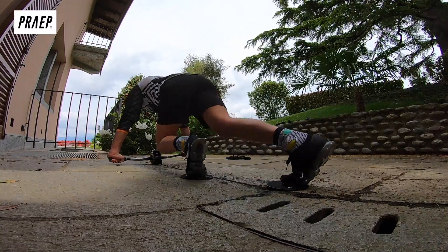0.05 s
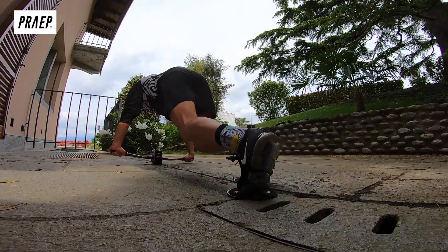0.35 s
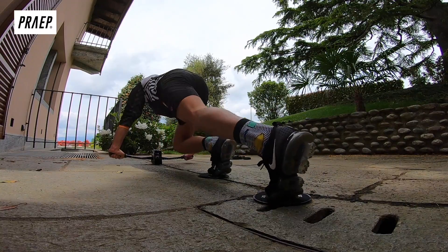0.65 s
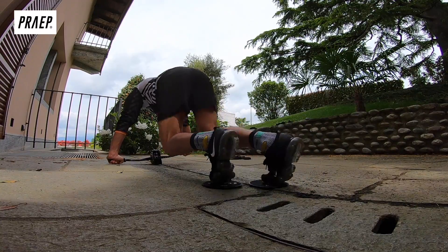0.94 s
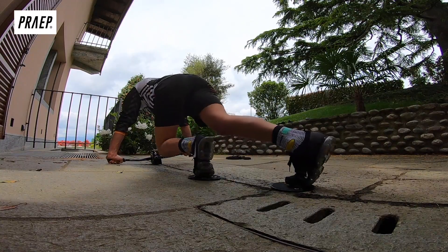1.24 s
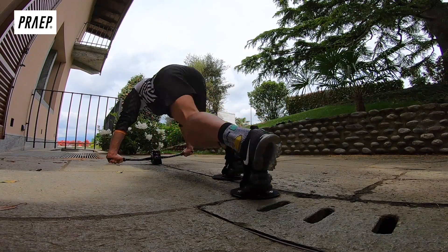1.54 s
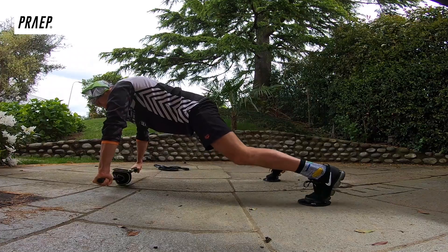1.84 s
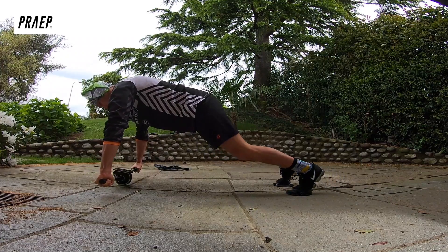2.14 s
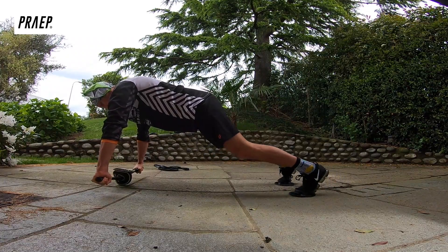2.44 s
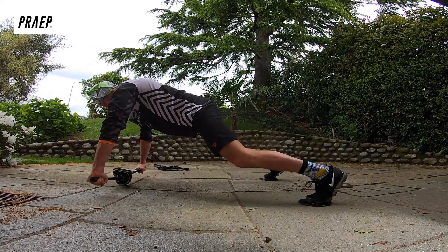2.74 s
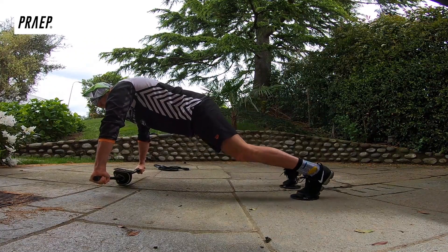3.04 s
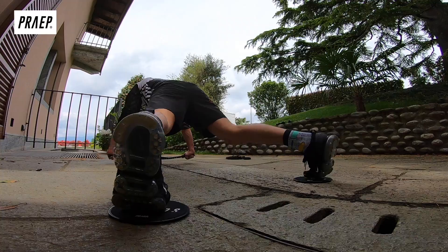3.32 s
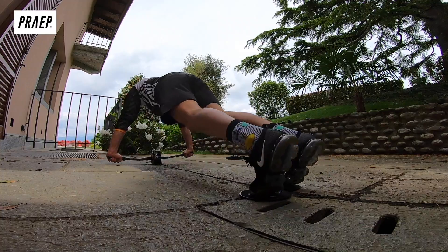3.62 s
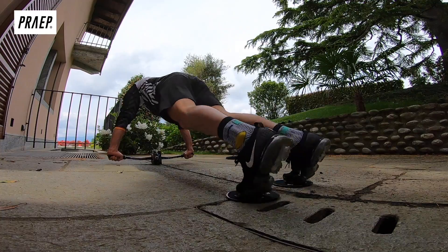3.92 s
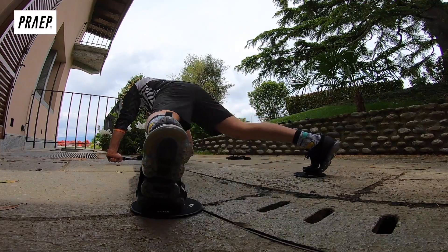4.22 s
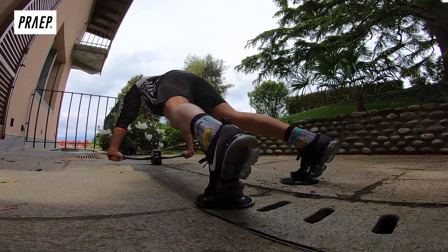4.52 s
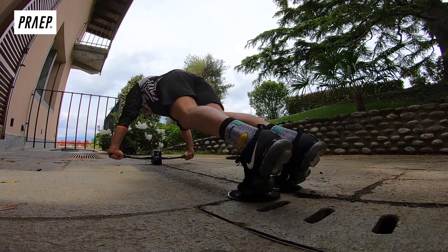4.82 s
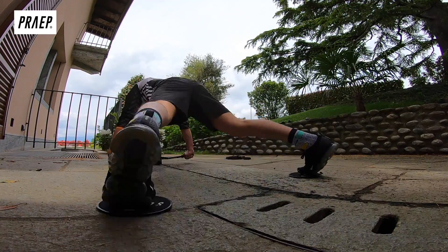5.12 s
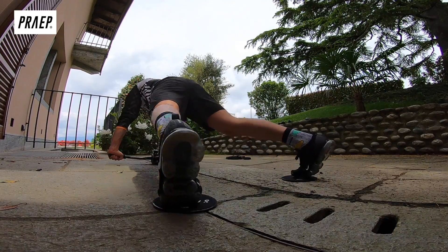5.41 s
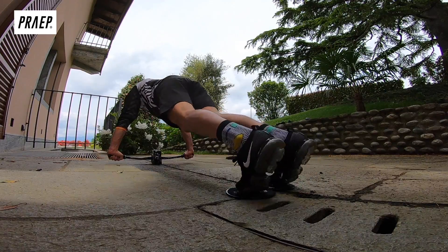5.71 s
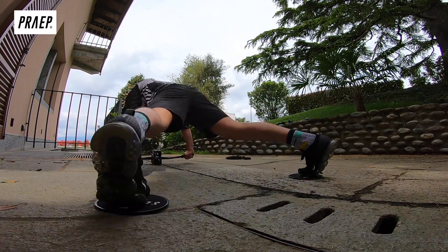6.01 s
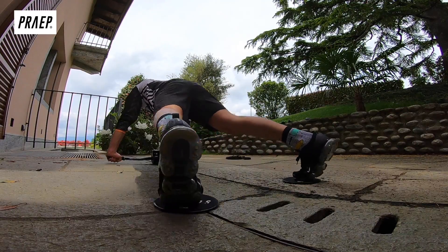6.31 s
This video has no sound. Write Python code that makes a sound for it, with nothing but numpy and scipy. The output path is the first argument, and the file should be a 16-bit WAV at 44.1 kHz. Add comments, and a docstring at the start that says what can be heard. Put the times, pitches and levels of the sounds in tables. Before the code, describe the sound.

Two plastic discs under a person's feet scrape back and forth over stone paving in about two gritty strokes a second. Rims click on joints, shoes thud softly, and a hollow drain cover gives a low boom now and then. The sound is close from behind the feet, turns thinner and brighter from the side for a moment, then is close again, over quiet outdoor air.

```python
"""Sliding discs on a stone terrace

Two plastic discs under a person's feet scrape back and forth over paving. Grit catches under the
rims in clumps and rings the shells; rims snag on joints, shoes thud over uneven stones and a hollow
drain cover booms as a disc judders across it. Heard in quiet garden air from close behind the feet,
and for a while from further off at the side."""
import sys
import numpy as np
from scipy import signal
from scipy.fft import rfft, irfft, next_fast_len
from scipy.io import wavfile
from scipy.ndimage import uniform_filter1d, map_coordinates

SR = 44100
rng = np.random.default_rng(int(sys.argv[2]) if len(sys.argv) > 2 else 0)


def digitize_waveform(pressure):
    """Quantize a signal to 16-bit integers and store it at the path in sys.argv[1].

    Rows of a 2-D input are taken as channels; values are limited to [-1, 1].
    """
    field = np.atleast_2d(pressure).T
    bounded = np.clip(field, -1, 1)
    quanta = np.round(bounded * 32767).astype(np.int16)
    wavfile.write(sys.argv[1], SR, quanta)


N = 280472

# tone of a disc from close behind: (frequency [Hz], gain [dB])
CLOSE_TONE = [(150, -35), (320, -11), (450, -15.5), (590, -11), (950, -8), (1400, -1.5), (2300, 0),
              (3400, -4), (4500, -10), (5600, -19.5), (7500, -27.5), (9600, -30.5), (11200, -41),
              (14500, -51.5), (15400, -70)]
# stereo balance from close behind: (frequency [Hz], left minus right [dB])
CLOSE_BALANCE = [(250, 0.3), (700, -3), (1400, -4), (2200, -2), (3800, -2), (5000, 0), (5700, -2.5),
                 (7800, -0.7), (9100, -2.5), (10500, -1)]


def amp(db):
    """Decibels to gain."""
    return 10 ** (np.asarray(db) / 20)


def unit(x):
    """Scale to an rms of 1."""
    return x / np.sqrt(np.mean(x ** 2) + 1e-20)


def along(points, hz):
    """Read (frequency, value) points on a log frequency axis."""
    f, values = np.transpose(points)
    return np.interp(np.log(hz + 1), np.log(f + 1), values)


def wobble(per_s):
    """A smooth random curve with per_s knots a second."""
    return map_coordinates(rng.standard_normal(int(N * per_s / SR) + 4), [np.arange(N) * per_s / SR])


def filtered(x, response):
    """Filter by a complex function of frequency."""
    size = next_fast_len(N + SR // 2, real=True)
    return irfft(rfft(x, size) * response(np.fft.rfftfreq(size, 1 / SR)), size)[..., :N]


def eq(x, points):
    """Shape the tone with (frequency [Hz], gain [dB]) points."""
    return filtered(x, lambda f: amp(along(points, f)))


def stereo(pair, balance):
    """Mix two unrelated signals to left and right: narrow in the bass, wide in the top treble."""
    # likeness of left and right: (frequency [Hz], coherence [ratio])
    coherence = [(200, 0.93), (500, 0.94), (950, 0.52), (2000, 0.69), (4200, 0.92), (5600, 0.21), (7500, 0),
                 (12000, 0.085)]

    def response(f):
        side = np.tan(np.arccos(np.clip(along(coherence, f), -1, 1)) / 2)
        lean = amp(along(balance, f) / 2)
        return np.array([[lean, lean * side], [1 / lean, -side / lean]])
    return filtered(pair, response).sum(axis=1)


def sliding(fade_db=30, creep_db=-20, creep_db_per_s=98, scuff_rise_s=0.026, scuff_release_s=0.074):
    """Rasp, growl, ring and hiss envelopes: a pushed disc speeds up, glides, brakes and creeps on."""
    # leg pushes: (time at speed [s], glide [s], rise [s], release [s], glide start level [dB],
    # glide end level [dB], start growl re rasp [dB], end growl re rasp [dB], ring re rasp [dB])
    strokes = [(0.0, 0.019, .05, 0.14, -26.5, -28, -13, -10.5, -8.5),
               (0.249, 0.32, 0.15, 0.12, -22, -25.5, -13, -8, -6),
               (0.815, 0.33, 0.091, 0.1, -26, -26, -6.5, -11.5, -0.5),
               (1.32, 0.14, 0.042, 0.019, -26, -21, -11.5, -10, -4.5),
               (1.511, 0.2, 0.0074, 0.02, -27, -25, -2.5, -9.5, -3.5),
               (1.909, .122, 0.033, .17, -24.5, -26, -10, -9.5, -6.5),
               (2.522, 0.12, 0.081, 0.096, -22, -26.5, -14, -7, -8),
               (2.971, 0.15, 0.091, 0.1, -24, -28.5, -12.5, -5, -6),
               (3.453, 0.22, 0.029, 0.15, -22.5, -26, -7, -11.5, 0),
               (3.994, 0.18, 0.078, 0.096, -20, -32.5, -11.5, -7, -0.5),
               (4.483, .19, 0.031, 0.13, -25.5, -25, -6, -10, -2.5),
               (4.975, 0.19, 0.1, 0.1, -25, -24.5, -11, -6.5, 0),
               (5.386, 0.15, 0.043, 0.19, -24, -24, -13.5, -7, 0.5),
               (5.829, 0.21, 0.12, 0.096, -27, -24, -7, -7.5, 0.5),
               (6.231, 0.12, 0.056, 0.089, -32, -26, -8.5, -7.5, 0)]
    # weight shifts and rim drags:
    # (time [s], length [s], level [dB], growl re rasp [dB], ring re rasp [dB])
    scuffs = [(0.135, 0.013, -25, -17, -7.5), (0.199, 0.0065, -27, -6.5, -2.5),
              (0.426, 0.07, -35.5, -0.5, 8.5), (0.7, 0.0056, -29, -4, -8), (0.739, 0.025, -32, -4.5, -12),
              (.845, 0.054, -34, 5.5, 10.5), (1.27, 0.024, -34.5, -13, -8), (1.471, 0.065, -31.5, -4, -5),
              (1.83, 0.072, -39.5, 2.5, 6.5), (2.283, 0.033, -49, -12, -23), (2.826, 0.076, -46, -3, -10),
              (3.207, 0.096, -55, -20, 1.5), (3.394, 0.023, -44, 1.5, 9), (3.918, 0.056, -32, -3.5, -2),
              (4.091, 0.078, -37.5, 8.5, 10.5), (4.331, 0.029, -46, -5, -9), (4.37, 0.028, -35.5, 1, -4.5),
              (4.846, 0.031, -52, 6, -1), (4.938, .025, -47, 4, -6), (5.619, 0.0086, -32, -3, 0)]
    t = np.arange(0, N, SR // 1000) / SR
    moves = []
    for at, glide, rise, release, start_db, end_db, growl_start, growl_end, ring_db in strokes:
        progress = np.clip((t - at) / glide, 0, 1)
        push = np.clip(1 + (t - at) / rise, 1e-6, 1) ** 2.26
        late = np.maximum(t - at - glide, 0)
        braking_db = np.maximum(-fade_db * late / release, creep_db - creep_db_per_s * late)
        speed_db = 20 * np.log10(push) + braking_db
        slow = np.minimum(-speed_db / 4.5, 1)  # a slow disc growls and hisses more, rings less
        press_db = growl_end - growl_start  # pressing the rim down also stirs the shell
        rasp = start_db + (end_db - start_db) * progress + speed_db
        growl = rasp + growl_start + press_db * progress + 5.5 * slow
        ring = rasp + ring_db + 0.43 * press_db * (progress - 0.5) - 1.5 * slow
        hiss = rasp + 1.5 * np.sin(np.pi * progress) + 2 * slow  # lifts at the fast midpoint
        moves.append([rasp, growl, ring, hiss])
    for at, length, db, growl_db, ring_db in scuffs:
        early, late = np.maximum(at - t, 0), np.maximum(t - at - length, 0)
        rasp = db - fade_db * (early / scuff_rise_s + late / scuff_release_s)
        moves.append([rasp, rasp + growl_db, rasp + ring_db, rasp])
    envelopes = np.sqrt(np.sum(amp(moves) ** 2, axis=0))
    roughness = amp(1.16 * wobble(per_s=55))  # the stone changes along the way
    return roughness * np.array([np.interp(np.arange(N) / SR, t, band) for band in envelopes])


def grit(per_s, scatter_db, smooth_db):
    """Tiny impacts of uneven size on a bed of smooth rubbing."""
    struck = rng.random((2, N)) < per_s / SR
    signs = rng.choice([-1, 1], (2, N))
    sizes = amp(scatter_db * np.clip(rng.standard_normal((2, N)), -2, 2))
    return unit(unit(struck * signs * sizes) + amp(smooth_db) * rng.standard_normal((2, N)))


def friction(clump_db, coarse_db, dust_db):
    """Sand catches and slips in clumps; coarser bumps add duller knocks, fine dust an even hiss."""
    sand = grit(per_s=4600, scatter_db=3.5, smooth_db=-3.5)
    bumps = eq(grit(per_s=520, scatter_db=1.5, smooth_db=-16), [(900, 0), (2000, -7), (5000, -5.5)])
    dust = np.diff(rng.standard_normal((2, N + 1)))  # rises towards the treble
    clumps = amp(clump_db * wobble(per_s=480) + wobble(per_s=110))
    return (sand + amp(coarse_db) * bumps) * clumps + amp(dust_db) * dust


def wandering_contact(force, depth_db):
    """The contact patch wanders, so narrow bands swell and fade within hundredths of a second."""
    spectra = signal.stft(force, SR, nperseg=1024)[2]
    patches = uniform_filter1d(rng.standard_normal(spectra.shape[1:]), size=5, axis=0)
    patches = uniform_filter1d(patches, size=3, axis=1)
    return signal.istft(spectra * amp(depth_db * unit(patches)), nperseg=1024)[1][:, :N]


def shell(f, hz=1755, width_hz=584):
    """Gain of the plastic shell's main resonance, with steep skirts."""
    return abs(1j * f * width_hz / (hz * hz - f * f + 1j * f * width_hz)) ** 2


def scrape(force, envelopes, tone, balance, growl_db, rasp_db, hiss_db):
    """Friction sounds through the disc: a loaded rim growls, a free shell rings, a fast disc hisses."""
    rasp, growl, ring, hiss = envelopes
    radiated = stereo(eq(force, tone), balance)
    below = lambda f, hz: 1 / (1 + (f / hz) ** 12)
    band = lambda response: unit(filtered(radiated, response))
    return (growl * amp(growl_db) * band(lambda f: below(f, hz=1490))
            + ring * band(shell)
            + rasp * amp(rasp_db) * band(lambda f: below(f, hz=4820) - below(f, hz=2250))
            + hiss * amp(hiss_db) * band(lambda f: 1 - below(f, hz=4890)))


def snags(t60, crunch_db, click_db):
    """A rim catches and lets go: one click and a brief crunch through the disc."""
    # catches on joints and stone chips: (time [s], relative level [dB])
    catches = [(0.385, -6), (.945, 3.5), (0.953, -4), (1.248, -22), (1.318, -6), (1.454, 4.5), (1.513, 0),
               (3.677, 1.5), (4.164, -2), (4.501, -4), (5.554, -2), (5.625, -10), (5.806, -5.5),
               (6.04, -0.5), (6.053, -4)]
    t = np.arange(SR // 10) / SR
    force = np.zeros((2, N + SR))
    for at, db in catches:
        crunch = amp(crunch_db - 60 * t / t60) * rng.standard_normal((2, len(t)))
        crunch[0, 0] = amp(click_db)
        force[:, round(at * SR):][:, :len(t)] += amp(db) * crunch
    force = eq(force[:, :N], [(500, 9.5), (2000, -1.5), (8000, 8)])  # broader in tone than sliding
    return stereo(eq(force, CLOSE_TONE), CLOSE_BALANCE)


def shoe_rumble(rasp, rumble_db, follow, thud_db, t60):
    """The shoe shakes as the disc slides, more on a hard stroke, and thuds at each drop."""
    # tone of the shaking shoe: (frequency [Hz], gain [dB])
    shoe_tone = [(30, -36), (80, -21), (125, -13), (160, 5.5), (210, 5), (260, -5.5), (340, -14),
                 (550, -20), (6000, -50)]
    # drops over uneven stones: (time [s], relative level [dB])
    drops = [(.191, -43), (.387, -38), (0.55, -43), (1.457, -41), (1.515, -45), (2.058, -38), (2.534, -47),
             (2.63, -38), (3.679, -38), (4.718, -45), (5.049, -40.5), (5.614, -39.5)]
    shaking = eq(grit(per_s=300, scatter_db=1.5, smooth_db=-12), shoe_tone)
    out = amp(rumble_db) * rasp ** follow * unit(stereo(shaking, CLOSE_BALANCE))
    t = np.arange(SR // 4) / SR
    envelope = (1 - np.exp(-t / 0.0074)) * amp(thud_db - 60 * t / t60)
    for at, db in drops:
        detune, tilt = rng.standard_normal(2)
        phase_per_hz = 2 * np.pi * t * np.exp(0.06 * detune)
        knock = np.sin(165 * phase_per_hz) + amp(1 + 2 * tilt) * np.sin(215 * phase_per_hz)
        out[:, round(at * SR):][:, :len(t)] += amp(db) * envelope * knock
    return out


def drain_cover(boom_db, judder_db, waver_rad, rattle_db):
    """The cover rattles and its hollow booms unevenly while a disc crosses, then rings out."""
    # passes over the cover: (time [s], length [s], low mode [dB], middle mode [dB], high mode [dB])
    crossings = [(0.754, 0.161, -39, -43.5, -44), (3.566, 0.017, -39, -38, -36.5),
                 (3.6, .12, -38.5, -50, -58), (3.895, 0.016, -49, -51, -54), (3.956, 0.089, -37, -31, -31),
                 (4.067, 0.066, -37.5, -43, -45), (4.579, 0.017, -63, -47, -40),
                 (4.68, 0.052, -44.5, -49, -46.5), (5.545, 0.096, -60, -45, -44),
                 (5.83, 0.021, -64, -45, -40.5)]
    # modes of the hollow below: (frequency [Hz], t60 [s])
    hollow_modes = [(95, 0.45), (126, 0.35), (207, 0.096)]
    age = np.arange(SR) / SR
    boom, shaken = np.zeros((2, N + SR))
    for at, length, *levels in crossings:
        late = np.maximum(age - length, 0)
        driven = np.minimum(age, length)  # the jolts stop when the disc has passed
        for (hz, t60), db in zip(hollow_modes, levels):
            jolts, drift = (map_coordinates(row, [driven * 40]) for row in rng.standard_normal((2, 44)))
            swell = (1 - np.exp(-age / 0.0032)) * amp(db + boom_db + judder_db * jolts - 60 * late / t60)
            boom[round(at * SR):][:SR] += swell * np.sin(2 * np.pi * hz * age + waver_rad * drift)
        shaken[round(at * SR):][:SR] += swell  # the rattle follows the highest, shortest mode
    rattle_tone = [(55, -34), (85, -21), (150, 9), (300, -2.5), (430, -37.5), (3000, -70)]
    rattle = unit(eq(rng.standard_normal(N), rattle_tone))
    return boom[:N] + amp(rattle_db) * shaken[:N] * rattle


def bounces(x, bounce_db, count):
    """Further off, weak early reflections from the paving, legs and low wall comb the sound."""
    delays_s = rng.uniform(0.0012, 0.014, (2, count))
    taps = np.zeros((2, SR // 20))
    taps[:, 0] = 1
    for ear, lags in zip(taps, delays_s):
        ear[(lags * SR).astype(int)] += amp(bounce_db) * rng.choice([-1, 1], count)
    return signal.fftconvolve(x, taps / np.linalg.norm(taps[0]), axes=1)[:, :N]


def terrace(x, t60, wet_db):
    """The house front and the garden wall add a short, faint reverb."""
    t = np.arange(SR // 2) / SR
    tail = rng.standard_normal((2, len(t))) * amp(-60 * t / t60) * (1 - np.exp(-t / 0.0021))
    reverb = signal.fftconvolve(x, tail / np.linalg.norm(tail[0]), axes=1)[:, :N]
    return x + amp(wet_db) * eq(reverb, [(2500, 3), (10000, 2.6)])


def garden(air_db, eddy_db):
    """A quiet bed of outdoor air, with faint low eddies that differ left and right."""
    # tone of the open air: (frequency [Hz], gain [dB])
    air_tone = [(25, -21), (60, -2), (110, -1), (190, -4), (300, -12), (700, -14), (2000, -9.5),
                (5000, -19), (10000, -26), (15000, -48)]
    air = eq(rng.standard_normal((2, N)), air_tone)
    eddies = eq(rng.standard_normal((2, N)), [(20, -18), (45, 1), (120, -22), (500, -70)])
    gusts = amp(eddy_db + 6.9 * wobble(per_s=9.9))
    return amp(air_db) * unit(stereo(air, balance=[(1000, 0)])) + gusts * unit(eddies)


def scene(side_from_s=1.74, side_to_s=3.365):
    """The scraping discs from behind or from the side, over shoes, drain cover and garden air."""
    # tone of a disc from the side: (frequency [Hz], gain [dB])
    side_tone = [(150, -59), (330, -29), (550, -14.5), (1020, -14), (1250, -2.5), (2000, 7.5), (3200, 7.5),
                 (4300, 1), (6000, -10.5), (7200, -15), (9600, -19.5), (11200, -30.5), (14500, -41),
                 (15400, -55)]
    # stereo balance from the side: (frequency [Hz], left minus right [dB])
    side_balance = [(300, 1), (800, -5.5), (1350, -8), (2600, -5), (5000, -1.5), (5700, -5.5), (7800, -0.5),
                    (9200, -3), (10500, .5)]
    t = np.arange(N) / SR
    aside = uniform_filter1d(1.0 * ((t > side_from_s) & (t < side_to_s)), size=256)
    force = wandering_contact(friction(clump_db=1.5, coarse_db=-1, dust_db=-1), depth_db=3)
    envelopes = sliding()
    close = scrape(force, envelopes, CLOSE_TONE, CLOSE_BALANCE,
                   growl_db=-1.5, rasp_db=-1.36, hiss_db=-12.5)
    distant = scrape(force, envelopes, side_tone, side_balance, growl_db=0, rasp_db=0, hiss_db=-5.5)
    discs = (1 - aside) * close + aside * bounces(distant, bounce_db=-16.5, count=6)
    discs += snags(t60=0.0086, crunch_db=-6.5, click_db=3)
    shoes = shoe_rumble(rasp=envelopes[0], rumble_db=-40.5, follow=0.4, thud_db=6.5, t60=0.16)
    shoes *= amp(-3 * aside)
    cover = drain_cover(boom_db=3, judder_db=4, waver_rad=0.82, rattle_db=-4)
    return terrace(discs, t60=0.4, wet_db=-20.5) + shoes + cover + garden(air_db=-62, eddy_db=-72.5)


def record(dry):
    """A brick-wall low-pass takes off the very top of the treble."""
    return filtered(dry, lambda hz: hz < 15300)


dry = scene()
out = record(dry)
digitize_waveform(out)
```